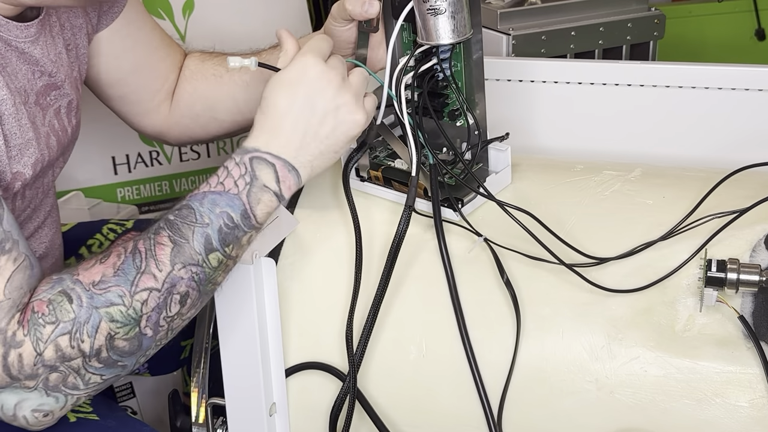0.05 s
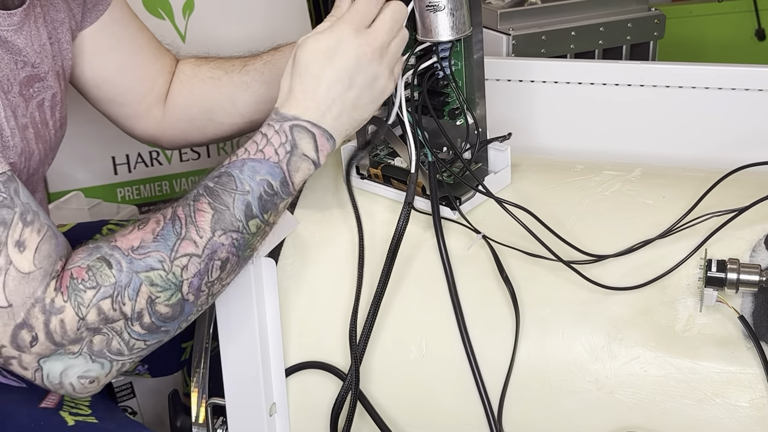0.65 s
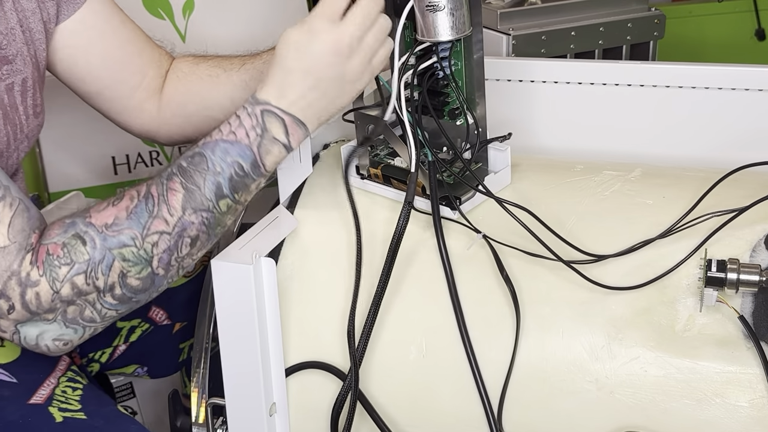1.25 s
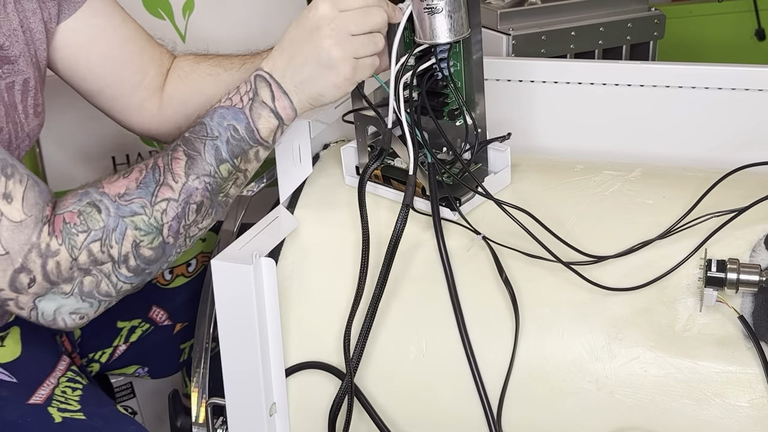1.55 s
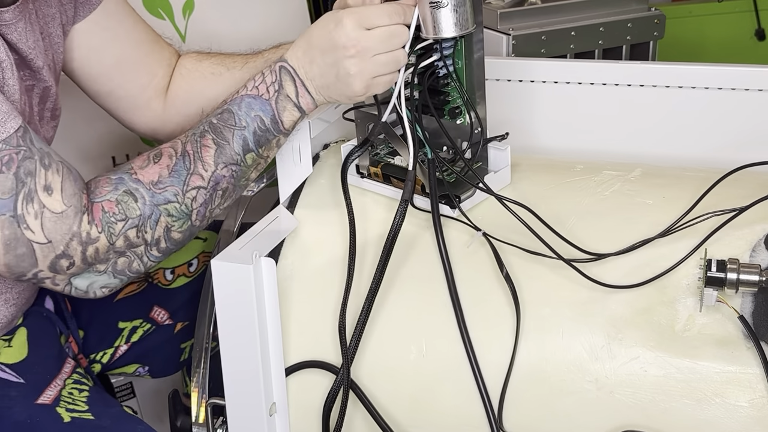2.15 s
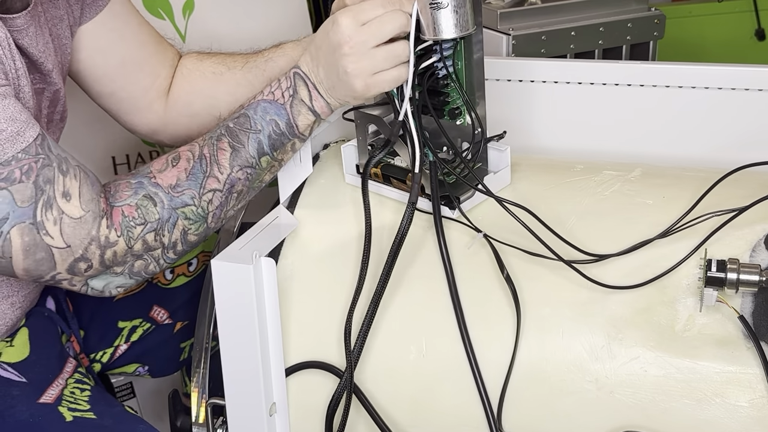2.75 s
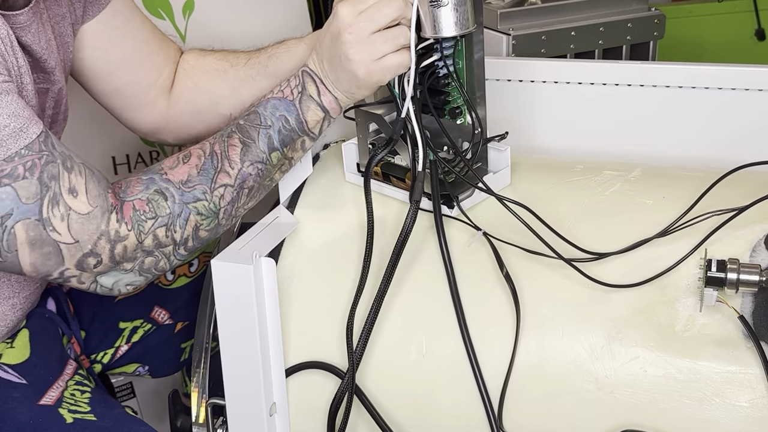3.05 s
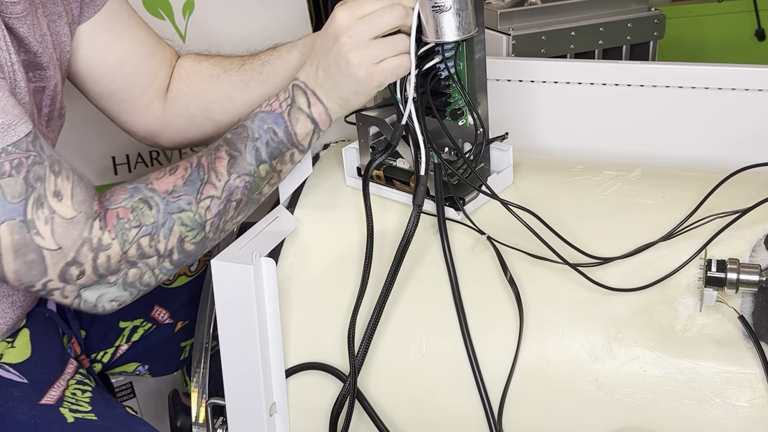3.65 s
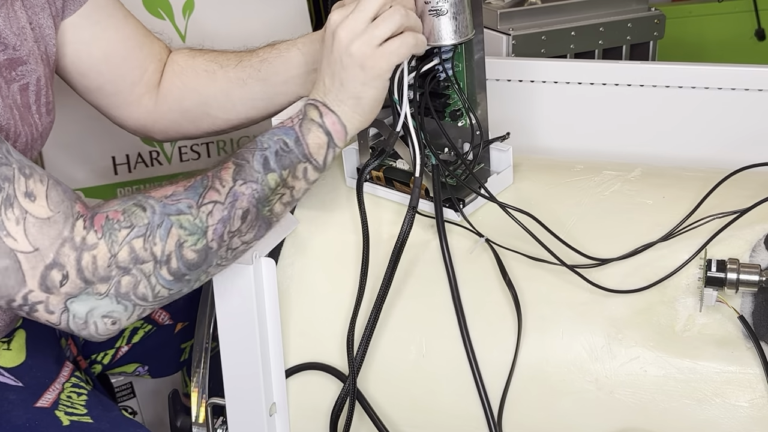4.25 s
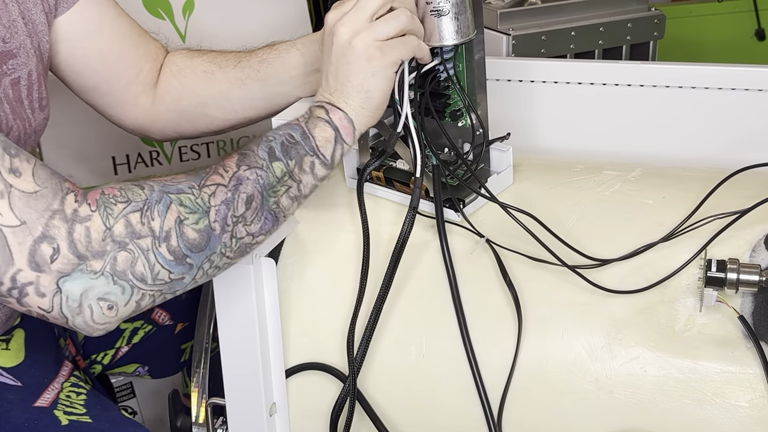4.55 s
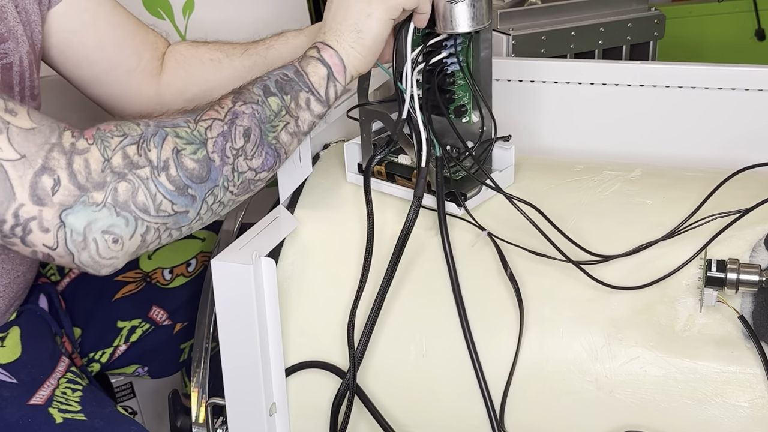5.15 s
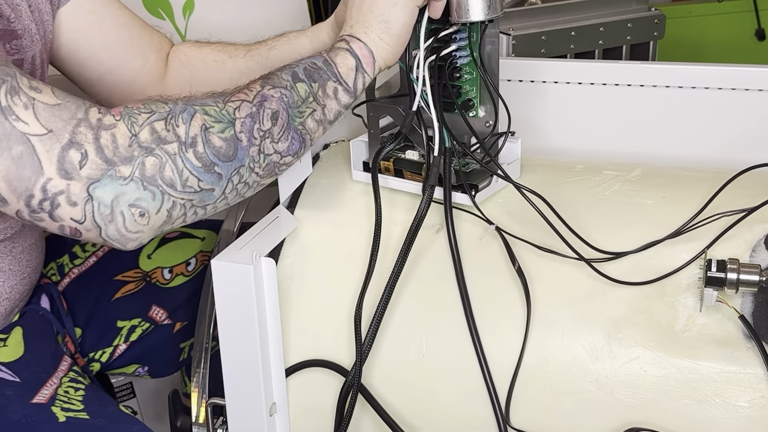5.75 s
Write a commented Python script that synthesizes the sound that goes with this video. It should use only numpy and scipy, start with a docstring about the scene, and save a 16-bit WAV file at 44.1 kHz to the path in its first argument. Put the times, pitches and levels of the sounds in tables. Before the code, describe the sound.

Small sharp clicks and plastic taps of plugs being pushed onto board terminals, while machines hum in a small workshop.

```python
"""Wire connectors snap onto the terminals of a circuit board, pushed by hand close to a phone.
Metal contacts crack and ring, plastic plugs knock on the board, fingers bump the housing,
and wires rub, tick and squeal. Machines hum steadily behind, with fan hiss and an airy whistle.
The small workshop gives every click a short tail."""
import sys
import numpy as np
from scipy import signal
from scipy.fft import rfft, irfft, next_fast_len
from scipy.io import wavfile
from scipy.ndimage import uniform_filter1d

SR = 44100
rng = np.random.default_rng(int(sys.argv[2]) if len(sys.argv) > 2 else 0)


def unload_audio(sound):
    """Save the sound as a 16-bit wav file, at the path given as the first command line argument."""
    columns = np.transpose(np.atleast_2d(sound))
    # keep every value between -1 and 1, then stretch to whole-number steps
    steps = np.round(np.clip(columns, -1, 1) * 32767)
    wavfile.write(sys.argv[1], SR, steps.astype(np.int16))


N = 255339
T = np.arange(N) / SR
HIT_T = T[:SR // 10]

# Modes of board and housing. Each row: frequency in Hz, level in dB, t60 in seconds.
BOARD_MODES = [(1023, -4.5, 0.021), (1120, -8, 0.043), (1250, -9.5, 0.039), (1505, -1, 0.02),
               (1720, -6.5, 0.028), (1960, -7, 0.042), (2545, -1, 0.0086), (2947, -2.5, 0.022)]
# Plastic knock. Each row: frequency in Hz, relative density in dB.
KNOCK_SPECTRUM = [(150, -42), (750, -19.5), (1100, -2), (1900, 3.5), (2300, -3.5), (3200, 2), (5000, -3.5),
                  (8000, -5), (16000, -24.5)]


def snap(hardness, plug_hz):
    """One click: the metal blades crack and ring; plug, board and housing knock."""
    # Each row: frequency in Hz, relative density in dB.
    crack_spectrum = [(300, -56.5), (2000, -25), (4000, -8), (7000, -1), (9500, 1.5), (11000, 2),
                      (12900, 5), (13700, 2), (15000, 1), (16500, -11.5)]
    # Each row: frequency in Hz, level in dB, t60 in seconds.
    blade_modes = [(7690, -5.5, .02), (10200, 0, 0.022), (10530, 9.5, .025), (10740, 6.5, 0.013),
                   (11540, 1, 0.02)]
    crack = burst(crack_spectrum, fast_s=0.0012, slow_s=0.005, slow_db=-16)
    metal = crack + undb(-10) * ring(blade_modes, detune=0.007)
    # A resting finger dulls the contact; a harder contact is brighter and louder.
    soft_edge_hz, hard_edge_hz = 5200, 17500
    edge_hz = soft_edge_hz * (hard_edge_hz / soft_edge_hz) ** hardness
    metal = colour(metal, [(edge_hz * 0.72, 0), (edge_hz, -2), (edge_hz * 2, -18)])
    metal_db = -0.5 + 14.5 * hardness
    plug = undb(-5) * ring([(plug_hz, 0, 0.0092)], detune=0.022)
    board = undb(-7) * ring(BOARD_MODES, detune=0.012)
    housing = burst(KNOCK_SPECTRUM, fast_s=0.0092, slow_s=0.02, slow_db=-13)
    return housing + board + plug + undb(metal_db) * metal


def snaps():
    """A contact jumps onto its terminal; most click again as they seat."""
    # Each row: start in seconds, knock level in dB, hardness (0 plastic, 1 bare metal),
    # plug pitch in Hz, delay of the seating click in seconds (0 for none).
    clicks = [(0.1164, -39.5, 0.88, 4800, 0.0092), (0.1196, -48, 0, 1890, 0.0017),
              (0.2068, -58, 0.41, 2840, 0.0009), (0.3704, -56.5, 0.32, 2850, 0.00031),
              (0.5929, -68.5, 0.55, 5150, 0.00086), (2.347, -60.5, 0, 5780, 0),
              (2.5108, -59, 0.39, 5783, 0.005), (3.1184, -58, 0.088, 2390, 0.00072),
              (3.131, -59, 0.43, 5600, 0.005), (3.2606, -46, 0.88, 6340, 0.0028),
              (3.3372, -43.5, 0.9, 1130, 0.0016), (3.3468, -46, 0.8, 6820, 0.001),
              (3.572, -49.5, 0.16, 3830, 0), (3.706, -39, 0.72, 4500, .0042),
              (3.7314, -52.5, 1, 6740, 0.0017), (4.008, -70.5, 0.56, 5700, 0.0038),
              (4.782, -58.5, 0, 6920, 0.0017), (4.8206, -37, 0.28, 2891, 0.0047),
              (5.767, -47, 0.78, 1450, 0.0067), (5.7875, -45.5, 0.76, 6550, 0.014)]
    out = np.zeros(N)
    for start_s, db, hardness, plug_hz, seat_s in clicks:
        add(out, start_s, undb(db) * snap(hardness, plug_hz))
        if seat_s > 0:
            add(out, start_s + seat_s, undb(db + 0.5) * snap(hardness, plug_hz))
    return out


def taps():
    """Plugs hit the board: the spot's hollow note over the board's modes, dulled by the soft contact."""
    # Each row: start in seconds, level in dB, spot note in Hz, its gain in dB, upper-mode gain in dB.
    hits = [(0.1209, -42.5, 1920, 5, 4), (2.0104, -44.5, 1533, 1, -3), (2.836, -43.5, 1560, -6, -2),
            (2.9237, -50.5, 1400, -12, -5.5), (3.12, -54, 1220, -6, -1), (3.182, -52.5, 1326, -2, -5),
            (3.263, -56, 1250, -3, -3), (3.3347, -52, 1150, 7.5, -6), (3.6024, -44.5, 1110, 8, -8),
            (3.6174, -48, 1133, 2, -13.5), (4.025, -57, 1590, -1, -2), (4.512, -44, 1687, -7.5, -2.5),
            (4.7813, -41.5, 1590, -15, -3), (4.823, -41, 1180, 4.5, -22), (5.152, -40, 1364, 1, -2.5)]
    spot_t60_s = 0.02  # damped by the fingers
    out = np.zeros(N)
    for start_s, db, spot_hz, spot_db, upper_db in hits:
        board = ring(BOARD_MODES, detune=0.014)
        spot = undb(spot_db) * ring([(spot_hz, 0, spot_t60_s)], detune=0.008)
        knock = undb(-5) * burst(KNOCK_SPECTRUM, fast_s=0.006, slow_s=0.012, slow_db=-18.5)
        contact = [(450, -15), (850, -4.5), (1300, 0), (1750, -0.5), (2400, upper_db),
                   (3100, upper_db), (4000, upper_db - 12.5), (16000, upper_db - 12)]
        add(out, start_s, undb(db) * blow(colour(board + spot + knock, contact)))
    return out


def bumps():
    """Soft fingertips move only the low modes of the housing."""
    # Each row: start in seconds, level in dB.
    touches = [(1.258, -56.5), (2.349, -58), (2.512, -53.5), (3.121, -46.5), (3.603, -53), (4.822, -49)]
    # Each row: frequency in Hz, relative density in dB.
    thud_spectrum = [(100, -15.5), (400, -2), (600, 1), (850, -3), (1400, -11), (5000, -36.5)]
    out = np.zeros(N)
    for start_s, db in touches:
        add(out, start_s, undb(db) * burst(thud_spectrum, fast_s=0.0072, slow_s=0.019, slow_db=-8))
    return out


def rub(slips, tilt_db_per_octave):
    """Slips heard through the insulation, rms 1."""
    # Each row: frequency in Hz, gain in dB.
    insulation = [(300, -1.5), (900, -8.5), (1300, 5.5), (1900, 4.5), (2500, 1), (4000, -2), (7000, -7.5),
                  (11000, -21), (16000, -31)]
    lowest_hz = insulation[0][0]
    tilted = [(hz, db + tilt_db_per_octave * np.log2(hz / lowest_hz)) for hz, db in insulation]
    return unit(colour(slips, tilted))


def wires():
    """Insulation rubs in tiny slips: swelling strokes, and a faint stir as fingers seek the terminal."""
    # Each row: fastest moment in seconds, level in dB, rise in seconds.
    strokes = [(.245, -64, 0.022), (.36, -67, 0.0092), (.374, -65, 0.006), (1.274, -76.5, 0.022),
               (1.598, -73, 0.013), (1.69, -77.5, 0.023), (1.809, -72.5, 0.035), (1.948, -68, 0.016),
               (2.065, -72, 0.013), (2.12, -75.5, 0.016), (2.31, -74.5, 0.017), (2.52, -69, 0.0079),
               (2.778, -67.5, 0.024), (3.066, -68.5, 0.03), (3.253, -68, 0.018), (3.498, -62.5, 0.017),
               (3.61, -65.5, 0.045), (3.672, -63.5, 0.013), (3.96, -74, 0.042), (4.675, -68.5, 0.01),
               (4.92, -63.5, 0.014), (5.09, -73.5, 0.068), (5.331, -63, 0.075), (5.43, -60, 0.053),
               (5.615, -69.5, 0.0096), (5.71, -64.5, 0.079)]
    slips = rng.standard_normal(N) * undb(3.4 * np.minimum(rng.exponential(size=N), 5))
    search_from_s, search_to_s = 1.64, 3.3
    searching = uniform_filter1d(1.0 * ((T > search_from_s) & (T < search_to_s)), size=SR // 20)
    out = searching * undb(-86.5 + 4.5 * walk(4.1)) * rub(slips, tilt_db_per_octave=-6)
    for peak_s, db, rise_s in strokes:
        moving = np.abs(T - peak_s) < 0.5
        t = T[moving] - peak_s
        width_s = np.where(t < 0, rise_s, 0.57 * rise_s)
        speed = np.exp(-(t / width_s) ** 2 / 2)
        tilt_db_per_octave = -0.5 + 0.28 * (db + 62)  # stronger is brighter
        out[moving] += undb(db) * speed * rub(slips[moving], tilt_db_per_octave)
    return out * undb(walk(30))


def catches(rubbing):
    """Sliding wires catch and let go with tiny ticks that follow the rubbing level."""
    # Each row: frequency in Hz, relative density in dB.
    tick_spectrum = [(700, -20), (1500, -1), (2500, 0), (4500, -7), (7500, -16), (15000, -34)]
    ticks_per_s = 70
    rubbing_rms = np.sqrt(np.abs(uniform_filter1d(rubbing ** 2, size=SR // 50)))
    ticks = (rng.random(N) < ticks_per_s / SR) * rng.uniform(0.39, 1, N)
    return rubbing_rms * undb(-8.5) * unit(colour(ticks, tick_spectrum))


def squeaks():
    """Plastic catches and slides in thin, narrow-band squeaks."""
    # Each row: peak time in seconds, level in dB, pitch in Hz, rise in seconds.
    slides = [(2.355, -84, 5900, 0.011), (2.526, -80, 5600, 0.013), (5.43, -75.5, 10160, 0.015)]
    out = np.zeros(N)
    t = HIT_T - HIT_T.mean()
    for peak_s, db, hz, rise_s in slides:
        band = [(hz * 0.7, -40), (hz * 0.94, -10), (hz, 0), (hz * 1.06, -10), (hz * 1.3, -40)]
        scrape = unit(colour(rng.standard_normal(len(t)), band))
        swell = np.exp(-(t / rise_s) ** 2 / 2)
        add(out, peak_s + t[0], undb(db) * swell * scrape)
    return out


def squeal():
    """A taut wire slips through the fingers with a faint, unsteady tone that drops as the pull eases."""
    # Each row: time in seconds, pitch in Hz, level in dB.
    pull = [(3.82, 11950, -110), (3.87, 11880, -98), (3.951, 12220, -97), (4.01, 11950, -99),
            (4.06, 11300, -99), (4.1, 11040, -100), (4.181, 11150, -97), (4.26, 11020, -110)]
    times_s, hz, db = np.transpose(pull)
    pitch_hz = np.interp(T, times_s, hz) + 45 * walk(90)
    level_db = np.interp(T, times_s, db) + walk(40)
    slipping = (T > times_s[0]) & (T < times_s[-1])
    return slipping * undb(level_db) * np.sqrt(2) * np.sin(2 * np.pi * np.cumsum(pitch_hz) / SR)


def whistle():
    """An airy band of noise swells and wanders in pitch."""
    # Each row: time in seconds, level in dB, pitch shift in Hz.
    course = [(0, -74, 0.5), (.45, -82, -29.5), (.67, -80, -0.5), (.88, -78.5, 60.5), (1.042, -86, 0.5),
              (1.11, -78, -39.5), (1.19, -76.5, -40), (1.3, -78, -21), (1.4, -73.5, 10),
              (1.52, -85.5, -0.5), (1.8, -75, -20.5), (2.2, -79.5, 0.5), (5.79, -77.5, -1)]
    # Each row: frequency in Hz, relative density in dB.
    band = [(1200, -35.5), (1570, -11), (1680, -2), (1810, -10), (2400, -34.5)]
    times_s, level_db, shift_hz = np.transpose(course)
    drift_hz = np.interp(T, times_s, shift_hz) + 18 * walk(5)
    shifted = np.real(signal.hilbert(noise(band)) * np.exp(2j * np.pi * np.cumsum(drift_hz) / SR))
    return undb(np.interp(T, times_s, level_db) + 1.2 * walk(12)) * shifted


def hum():
    """Mains and motor tones waver; higher ones lean further left."""
    # Each row: frequency in Hz, level in dB, wavering share.
    tones = [(49.83, -57.5, 0.02), (56.27, -60.5, 0.42), (89.5, -58.5, 0.69), (101.1, -61, 0.53),
             (120.2, -54.5, 0.025), (166.6, -68.5, 0.93), (197.5, -72, .7), (240.1, -71.5, 0.1),
             (317, -74, 0.79), (390.8, -73, 0.22), (441, -84, 0.31)]
    lean_db_per_hz = 0.0137 * np.array([[1], [-1]]) / 2
    out = np.zeros((2, N))
    for hz, db, waver in tones:
        swing = 1 - waver + waver * (walk(4.1) + 1j * walk(2.3))
        tone = unit(np.real(swing * np.exp(2j * np.pi * (hz * T + rng.random()))))
        out += tone * undb(db + lean_db_per_hz * hz)
    return out


def machines():
    """Diffuse low rumble and faint fan hiss, with the whistle and the hum."""
    # Each row of both: frequency in Hz, relative density in dB.
    rumble_spectrum = [(20, -54), (36, -25.5), (48, -3.5), (62, 4), (90, 6.5), (135, -8), (175, -4),
                       (270, -17.5), (420, -18.5), (580, -33), (1150, -66)]
    fan_spectrum = [(300, -10), (700, 2), (1100, -13), (1700, -1.5), (2300, -9.5), (3000, -8.5),
                    (4200, -20.5), (7000, -20.5), (10000, -31.5), (16000, -30)]
    rumble = undb(-52.5) * spread(noise(rumble_spectrum), noise(rumble_spectrum))
    fan = undb(-75.5 + 0.5 * walk(4.1)) * spread(noise(fan_spectrum), noise(fan_spectrum))
    return rumble + fan + whistle() + hum()


def bench(x, lag_s, echo_db):
    """The hard work surface adds one early reflection."""
    return x + undb(echo_db) * np.interp(T - lag_s, T, x, left=0)


def room(x, wet_db, build_s):
    """Dense wall echoes build up quickly and lose their treble first."""
    # Each row: frequency in Hz, t60 in seconds.
    decay = [(500, 0.61), (1600, 0.32), (4200, 0.38), (8000, 0.26), (11000, 0.21), (16000, 0.07)]
    centres_hz, t60s = np.transpose(decay)
    t = T[:SR * 3 // 4]
    hz = np.fft.rfftfreq(len(t), 1 / SR)
    spectra = rfft(rng.standard_normal((2, len(t))))
    tails = np.zeros((2, len(t)))
    for share, t60_s in zip(np.eye(len(decay)), t60s):
        band = along(np.c_[centres_hz, share], hz)
        tails += irfft(spectra * band, len(t)) * np.exp(-np.log(1000) * t / t60_s)
    tails *= 1 - np.exp(-t / build_s)
    echoes = spread(*tails) * undb(wet_db) / np.sqrt(np.sum(tails[0] ** 2))
    return signal.oaconvolve(x[None], echoes, axes=1)[:, :N]


def all_round(source, wet_db, build_s, count):
    """A struck part sends each wall a different mix of modes, so its echoes sum to a pitchless tail."""
    return sum(room(source(), wet_db, build_s) for _ in range(count)) / np.sqrt(count)


def spread(mid, other):
    """Diffuse sound: an unrelated part reaches the phone's two ports with opposite signs."""
    # Each row: frequency in Hz, gain of that part in dB.
    width = [(60, -19), (130, -12), (300, -8), (650, -3), (1300, -4), (2400, -16), (6000, -27),
             (15000, -13)]
    size = next_fast_len(len(mid), real=True)
    side_gain = undb(along(width, np.fft.rfftfreq(size, 1 / SR)))
    side = irfft(rfft(other, size) * side_gain, size)[:len(mid)]
    return np.array([mid + side, mid - side])


def ring(modes, detune):
    """Struck modes (Hz, dB, t60 in seconds); the grip shifts their pitch a little on every blow."""
    hz, db, t60_s = np.transpose(modes)[:, :, None]
    pitch_ratio = 1 + detune * rng.standard_normal(hz.shape)
    sign = rng.choice([-1, 1], hz.shape)
    waves = np.sin(2 * np.pi * hz * pitch_ratio * HIT_T) * np.exp(-np.log(1000) * HIT_T / t60_s)
    return blow(np.sum(sign * undb(db) * waves, axis=0))


def burst(spectrum, fast_s, slow_s, slow_db):
    """Many close modes as noise: a quick crack and a weaker, longer rattle."""
    fade = np.exp(-HIT_T / fast_s) + undb(slow_db) * np.exp(-HIT_T / slow_s)
    return blow(colour(rng.standard_normal(len(HIT_T)) * fade, spectrum))


def noise(spectrum):
    """Steady noise of the given (Hz, dB) spectrum, rms 1."""
    size = next_fast_len(N, real=True)
    gain = undb(along(spectrum, np.fft.rfftfreq(size, 1 / SR)))
    return unit(irfft(rfft(rng.standard_normal(size)) * gain, size)[:N])


def walk(rate_hz):
    """Random drift up to about rate_hz, rms 1."""
    size = 4096
    hz = np.fft.rfftfreq(size, N / SR / size)
    slow = irfft(rfft(rng.standard_normal(size)) / (1 + (hz / rate_hz) ** 4))
    return unit(np.interp(T, np.linspace(0, N / SR, size), slow))


def colour(x, response):
    """Minimum-phase filter with the given (Hz, dB) response."""
    size = 2048
    cepstrum = irfft(np.log(undb(along(response, np.fft.rfftfreq(size, 1 / SR)))))
    cepstrum[1:size // 2] *= 2
    cepstrum[size // 2 + 1:] = 0
    return signal.fftconvolve(x, irfft(np.exp(rfft(cepstrum))))[:len(x)]


def along(points, hz):
    """Interpolate a table on a log-frequency axis."""
    points_hz, values = np.transpose(points)
    return np.interp(np.log(hz + 1), np.log(points_hz), values)


def add(track, start_s, sound):
    """Mix a sound in at start_s."""
    start = int(np.clip(start_s * SR, 0, N - 1))
    track[start:start + len(sound)] += sound[:N - start]


def blow(x):
    """Scale a hit to the energy of 1 ms at level 1."""
    return x / np.sqrt(np.sum(x ** 2) * 1000 / SR)


def unit(x):
    """Scale to rms 1."""
    return x / np.sqrt(np.mean(x ** 2))


def undb(db):
    """Decibels to gain."""
    return 10 ** (np.asarray(db) / 20)


def scene():
    """Handwork in its room, over the machines; the taps face the phone and sound drier."""
    rubbing = wires()
    handling = bumps() + rubbing + catches(rubbing) + squeaks() + squeal()
    direct = bench(snaps() + handling, lag_s=0.0033, echo_db=-16) + taps()
    echoes = (all_round(snaps, wet_db=-6.5, build_s=0.0012, count=3)
              + all_round(taps, wet_db=-8.5, build_s=0.0013, count=3)
              + room(handling, wet_db=-5.5, build_s=0.00068))
    fade_in = np.minimum(T / 0.006, 1)
    return (direct + echoes + machines()) * fade_in


def record(dry):
    """The phone's two ports differ in phase in the treble; the top is cut."""
    # Each row: frequency in Hz, lead of the left port in radians.
    port_phase = [(2000, 0), (3400, -.55), (6300, -.45), (7400, 0), (8100, 1.9), (8500, 3.0), (9400, 3.3),
                  (9900, 4.3), (11100, 6.3), (13400, 9.4), (15600, 12.5)]
    top_hz = 16200
    size = next_fast_len(N + len(HIT_T), real=True)
    lead_rad = np.interp(np.fft.rfftfreq(size, 1 / SR), *np.transpose(port_phase))
    rotation = np.exp(1j * lead_rad * np.array([[1], [-1]]) / 2)
    pair = irfft(rfft(dry, size) * rotation, size)[:, :N]
    return signal.sosfilt(signal.ellip(8, 0.2, 70, top_hz, fs=SR, output="sos"), pair)


dry = scene()
out = record(dry)
unload_audio(out)
```